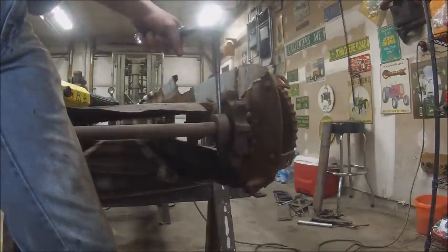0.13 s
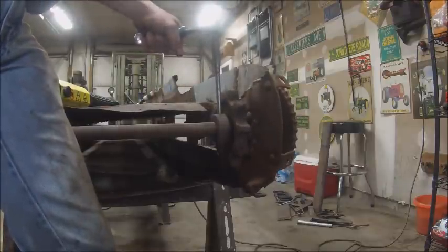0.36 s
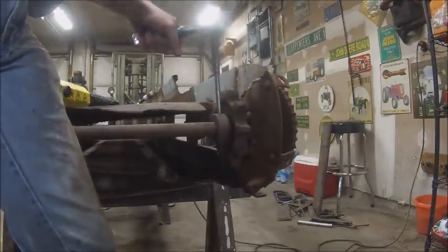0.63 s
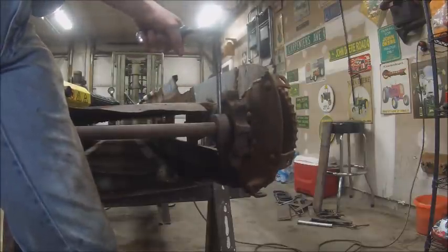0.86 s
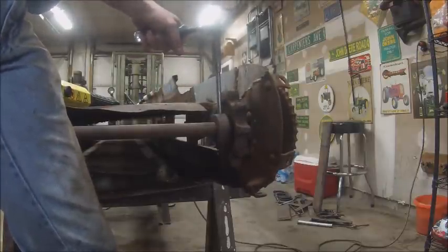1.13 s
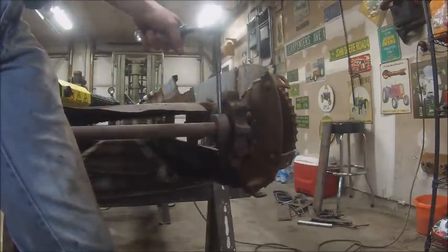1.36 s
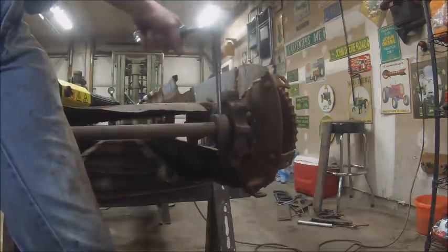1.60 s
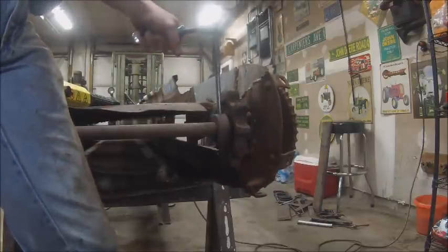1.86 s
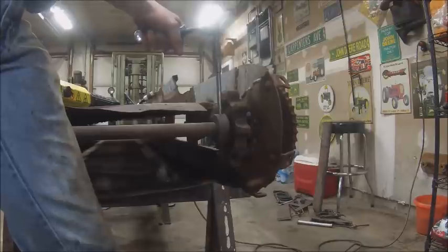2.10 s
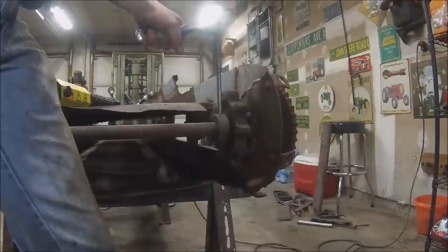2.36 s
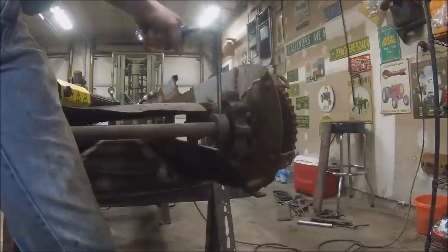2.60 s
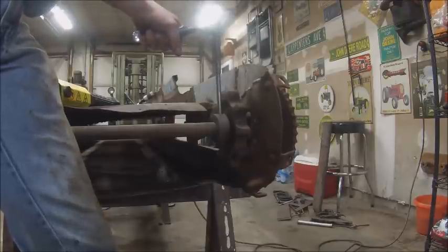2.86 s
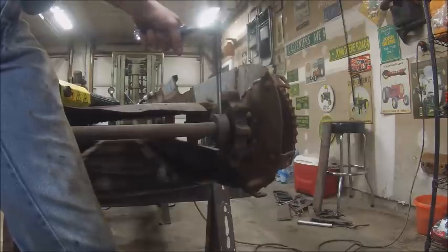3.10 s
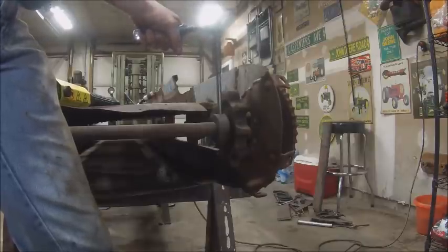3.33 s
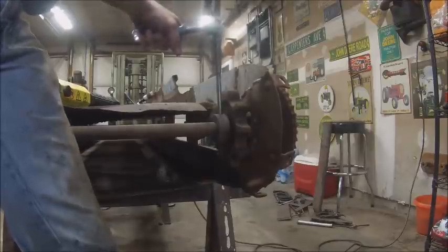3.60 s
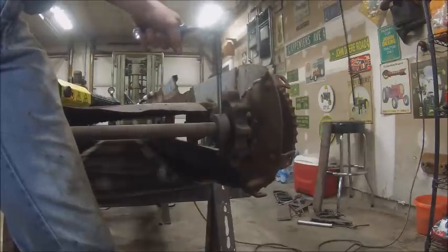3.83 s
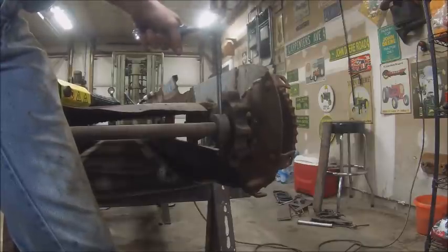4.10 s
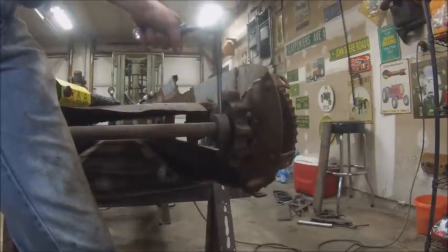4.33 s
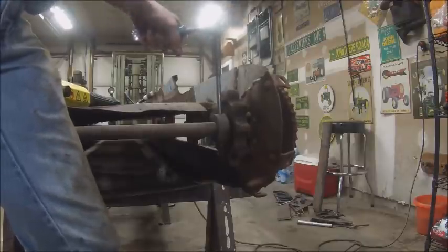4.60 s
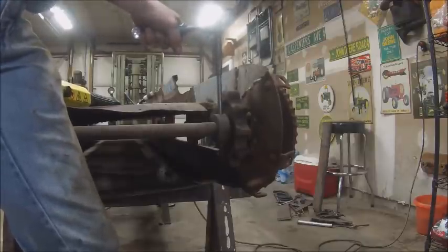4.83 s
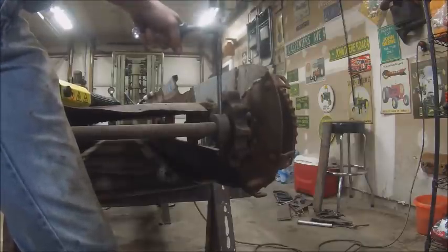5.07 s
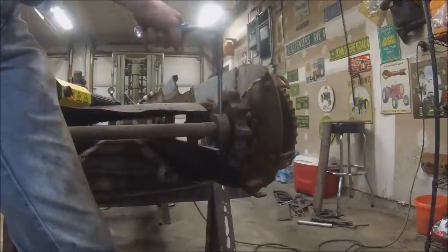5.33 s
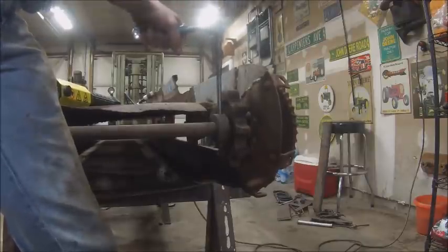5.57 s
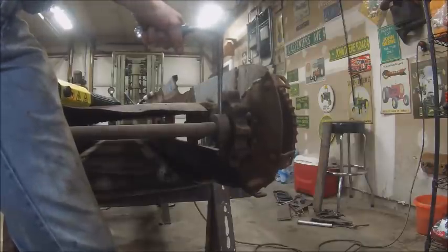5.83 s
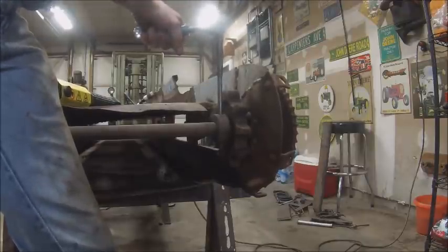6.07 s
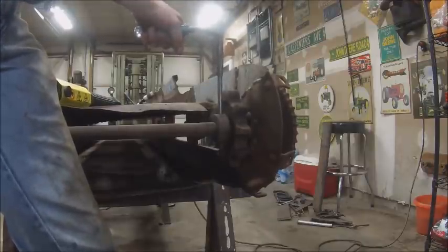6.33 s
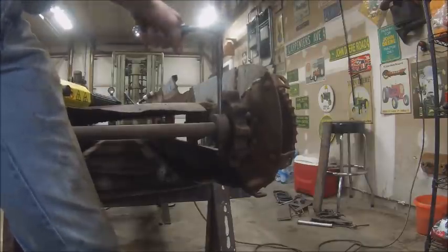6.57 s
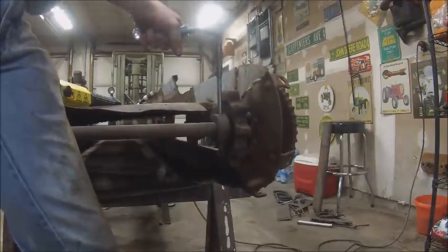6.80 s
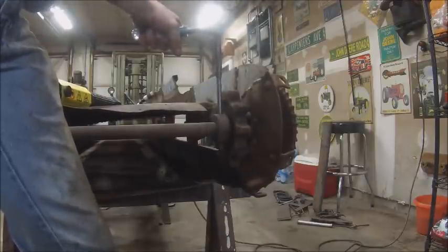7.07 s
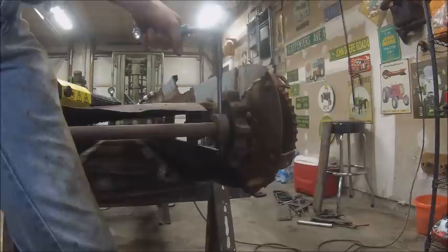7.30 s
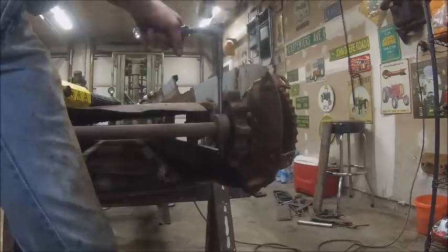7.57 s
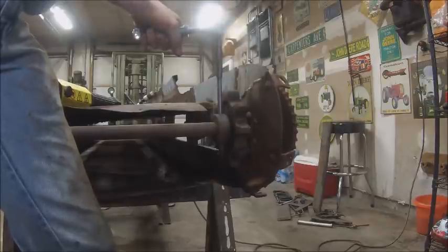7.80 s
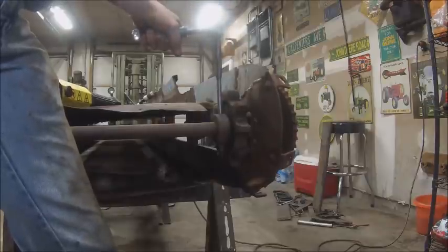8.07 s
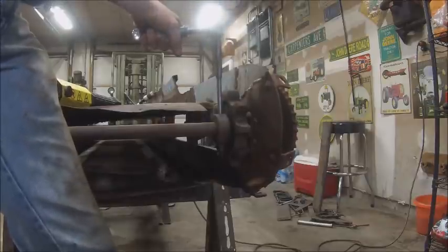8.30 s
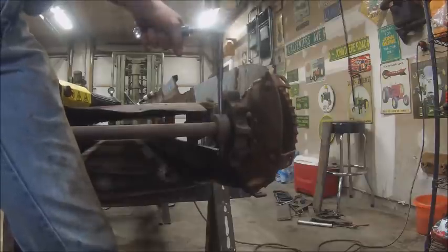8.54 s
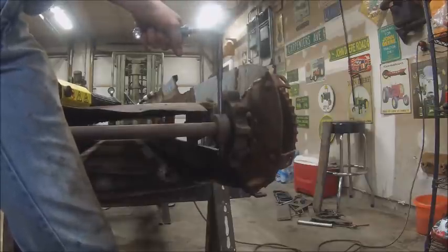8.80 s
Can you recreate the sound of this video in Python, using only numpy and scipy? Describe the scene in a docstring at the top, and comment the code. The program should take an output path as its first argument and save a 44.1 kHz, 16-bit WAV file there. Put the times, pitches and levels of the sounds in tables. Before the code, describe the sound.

Eighteen metallic strikes in a steady tap-and-blow rhythm: a lighter, singing tap, then a louder, brighter crack with a dense clang and frame boom. Loose steel rattles briefly after contact, and the punch scrapes faintly and sings very high between hits. The indoor shop rings on, with quiet low air beneath. Close camera sound, slightly squashed and clipped at the peaks, with tails rising after each hit.

```python
"""Hammer and punch in a workshop

A hammer drives a steel punch against a seized bolt: a light seating tap, then a full blow, in turn.
Noise makes the crack, the rattle and the clang; fading sine waves make the head sing and the frame boom.
The punch scrapes as it settles back and its rod sings, over steady air in a hard-walled shop that rings on.
The camera's look-ahead gain control ducks the blows and lets their tails swell back."""
import sys
import numpy as np
from scipy import signal
from scipy.fft import rfft, irfft
from scipy.io import wavfile
from scipy.ndimage import uniform_filter1d, minimum_filter1d, map_coordinates

SR = 44100
rng = np.random.default_rng(int(sys.argv[2]) if len(sys.argv) > 2 else 0)


def put_to_file(sound):
    """Save the sound as 16-bit audio at rate SR, in the file named by the first command-line argument."""
    columns = np.atleast_2d(sound).T  # one column per channel
    safe = np.clip(columns, -1, 1)
    whole_steps = np.round(safe * 32767)
    wavfile.write(sys.argv[1], SR, whole_steps.astype(np.int16))


def volts_from_db(level):
    """Convert decibel levels to linear amplitude ratios."""
    exponent = np.asarray(level, float) / 20
    return 10 ** exponent


N = 393372  # length of the scene (samples)


def unit(x):
    """Scales a sound to an rms of 1."""
    return x / np.sqrt(np.mean(x ** 2) + 1e-20)


def along(points, hz):
    """Reads a curve of (pitch_hz, value) points on a logarithmic pitch axis."""
    point_hz, value = np.transpose(points)
    return np.interp(np.log(hz + 1), np.log(point_hz + 1), value)


def fade(t, t60):
    """Exponential decay that falls 60 dB in t60 seconds."""
    return volts_from_db(-60 * t / t60)


def colour(x, spectrum, tilt_db=0):
    """Filters a sound by a spectrum, tilted above 1 kHz by tilt_db per octave."""
    hz = np.fft.rfftfreq(len(x), 1 / SR)
    octaves_above = np.log2(np.maximum(hz / 1000, 1))
    gain = volts_from_db(along(spectrum, hz) + tilt_db * octaves_above)
    return irfft(rfft(x) * gain, len(x))


def noise(length, spectrum, tilt_db=0):
    """Coloured noise with an rms of 1."""
    return unit(colour(rng.standard_normal(length), spectrum, tilt_db))


def add(out, s, x):
    """Mixes x into out from time s (seconds)."""
    part = out[round(s * SR):][:len(x)]
    part += x[:len(part)]


def ring(t, hz, db, t60, spread_db, cycles, split, blur):
    """Fading modes of random strength: each swells over some cycles, wanders in phase and beats with a twin."""
    level_db, twin = rng.standard_normal((2, len(hz), 1))
    steps = rng.standard_normal((len(hz), len(t)))
    wander = np.cumsum(steps, axis=1) * np.sqrt(blur * hz[:, None] / SR)
    phase = 2 * np.pi * hz[:, None] * t
    swell = 1 - fade(t, cycles / hz[:, None])
    shape = volts_from_db(db[:, None] + spread_db * level_db) * fade(t, t60[:, None]) * swell
    pair = np.sin(phase + wander) + 1.08 * np.sin(phase * (1 + split * twin))
    return (shape * pair).sum(axis=0)


# Steady air of the shop, relative levels: (pitch_hz, level_db per Hz)
AIR_SPECTRUM = [(12, -46), (20, -17), (91, -17), (128, -7.5), (155, -1), (194, 6.5), (230, -16),
                (439, -25.5), (1110, -35.5), (4150, -58.5), (6330, -49), (16400, -68)]


def shop_air():
    """The steady air of the shop is quiet noise, strongest in the low range."""
    return volts_from_db(-49.5) * noise(N, AIR_SPECTRUM)


# How the shop's diffuse sound grows and dies: (pitch_hz, build_up_s, early_t60_s, late_t60_s)
SHOP_DECAY = [(100, 0.74, 0.71, 2.66), (282, 0.17, 0.34, 1.51), (1000, 0.0033, 0.42, 1.19),
              (2910, 0.0061, 0.28, 0.96), (8250, 0.014, 0.15, 0.64), (15000, 0.011, 0.079, 0.45)]


def echoes(spectrum, tilt_db, early_db):
    """A fresh diffuse tail of energy 1: each band builds up, drops fast at first, then dies slowly."""
    length = round(1.3 * SR)
    hz, t, bands = signal.stft(noise(length, spectrum, tilt_db), SR, nperseg=128)
    decay = np.array(SHOP_DECAY)
    build, early, late = [along(decay[:, [0, k]], hz)[:, None] for k in range(1, 4)]
    dying = np.hypot(volts_from_db(early_db) * fade(t, early), fade(t, late))
    tail = signal.istft(bands * (1 - fade(t, build)) * dying, SR, nperseg=128)[1][:length]
    return tail / np.linalg.norm(tail)


def in_shop(x, wet_db):
    """Ringing steel is heard directly and, by convolution with a diffuse tail, through the room."""
    out = volts_from_db(wet_db) * signal.fftconvolve(x, echoes([(1000, 0)], 0, early_db=17))
    out[:len(x)] += x
    return out


# Dense clang of the struck steel, one list for a tap and one for a full blow,
# relative levels: (pitch_hz, level_db per Hz)
CLANG_SPECTRA = [
    [(24, -68), (40, -40), (121, -22.5), (231, -15), (290, -1.5), (556, -15), (770, -13), (942, -13.5),
     (1350, -17.5), (2260, -20), (6650, -19.5), (7730, -22.5), (14100, -33), (15300, -37.5), (16000, -80)],
    [(24, -59), (40, -21), (75, -27.5), (121, -18), (231, -6), (372, -5), (467, -11.5), (751, -9),
     (873, -11.5), (1370, -15), (2200, -18.5), (7540, -23.5), (14500, -34.5), (15300, -41.5), (16000, -87)],
]


def clang(full, tilt_db, early_db):
    """The struck steel fills the shop with a dense clang: noise that dies away band by band."""
    clang_db = [16, 19][full]  # over the blow's strength
    return volts_from_db(clang_db) * echoes(CLANG_SPECTRA[full], tilt_db, early_db)


# First contact of steel on steel, one list for a tap and one for a full blow,
# relative levels: (pitch_hz, level_db per Hz)
CRACK_SPECTRA = [
    [(180, -67), (400, -19), (1000, -17), (2090, -11), (6540, -12.5), (7480, -22), (9620, -30.5),
     (14600, -36), (16400, -49)],
    [(180, -47), (400, -9.5), (1000, -2), (2130, -4.5), (5180, -8), (7870, -8), (8850, -14), (14600, -27),
     (16400, -48)],
]


def crack(t, full, tilt_db):
    """Steel meets steel in a short burst of noise, followed by an uneven rattle of loose steel."""
    crack_db, crack_s = [-4, 1][full], [.0022, .003][full]  # over the blow's strength; length
    rattle_db, rattle_t60_s = [-20, -21][full], .12  # typical level under the contact
    knocks_db = 4 * map_coordinates(rng.standard_normal(140), [t * 250])  # loose steel knocks unevenly
    contact = np.exp(-(t / crack_s) ** 3)
    rattle = volts_from_db(knocks_db + rattle_db) * fade(t, rattle_t60_s)
    burst = (1 - fade(t, .004)) * (contact + rattle)  # quick but soft start
    return volts_from_db(crack_db) * burst * noise(len(t), CRACK_SPECTRA[full], tilt_db)


# Modes of the sprocket, shaft and frame, relative levels:
# (pitch_hz, tap_level_db, full_blow_level_db, t60_s)
FRAME_MODES = [(129, -8, -8, .6), (188, -9, -7, .8), (292, -4, -2, .3), (334, -12, -8, .3),
               (370, -5, 1, .65), (436, -14, -8, .2), (603, -14, -8, .15), (883, -10, -12, .15),
               (720, 1, -10, .15), (762, 4, -6, .18), (829, 0, -10, .15), (1365, 6, -3, .07),
               (1093, -6, -8, .12), (1207, -6, -5, .08), (1990, 3, 3, .02), (2140, -11, -13, .12),
               (3200, -11, -22, .3), (4320, -14, -24, .15), (5285, -11, -25, .3)]


def frame(t, full):
    """The sprocket, shaft and frame boom together as many fading modes."""
    boom_db = [-24, -22][full]  # over the blow's strength
    modes = np.transpose(FRAME_MODES)
    return volts_from_db(boom_db) * ring(t, modes[0], modes[1 + full], modes[3],
                               spread_db=1.5, cycles=7.9, split=.02, blur=.04)


# The hammer head's two bell modes, damped sooner when a full blow presses the head on the punch:
# (pitch_hz, tap_t60_s, full_blow_t60_s)
HEAD_MODES = [(7472, .075, .015), (7785, .05, .015)]


def hammer_head(t, full, head_db):
    """The hammer head sings in two high bell modes, more briefly after a full blow."""
    modes = np.transpose(HEAD_MODES)
    return ring(t, modes[0], np.array(head_db), modes[1 + full], spread_db=1, cycles=8, split=.002, blur=.01)


# Taps and full blows in turn; the head levels are over the blow's strength:
# (start_s, strength_db, lower_head_mode_level_db, upper_head_mode_level_db)
BLOW_LIST = [(.171, -7, -25.5, -15.5), (0.6137, -2.5, -32, -30.5), (1.1597, -8, -19, -24),
             (1.604, -4.5, -18.5, -14), (2.1401, -8.5, -18, -25), (2.6, -3, -23, -20),
             (3.1135, -8.5, -16.5, -28.5), (3.5755, -2.5, -29, -10), (4.0773, -7, -15, -23),
             (4.5432, -4, -33, -24), (5.0634, -8, -17, -22), (5.5421, -2.5, -32, -23.5),
             (6.0425, -8, -14.5, -23), (6.527, -3.5, -22, -19), (6.9938, -11, -18, -9),
             (7.4715, -2.5, -27, -26), (7.9679, -9.5, -19.5, -12.5), (8.4492, -3, -26, -20)]


def hammer():
    """Each blow cracks, fills the shop with a clang and sets the frame and the hammer head ringing."""
    out, t = np.zeros(N), np.arange(SR // 2) / SR
    bright_db = [-2.5, 0.06]  # tilt above 1 kHz for a tap and a full blow (dB per octave)
    room_db = [-5.5, -6]  # the ringing steel in the room, for a tap and a full blow

    # a full blow before the start still rings in the shop
    earlier_s, earlier_db = 0.32, -13.5  # time since that blow; its strength
    earlier = clang(1, bright_db[1], early_db=15)
    add(out, 0, volts_from_db(earlier_db) * earlier[round(earlier_s * SR):])

    for k, (s, db, *head_db) in enumerate(BLOW_LIST):
        full = k % 2  # 0 for a tap, 1 for a full blow
        steel = frame(t, full) + hammer_head(t, full, head_db)
        add(out, s, volts_from_db(db) * crack(t, full, bright_db[full]))
        add(out, s, volts_from_db(db) * clang(full, bright_db[full], early_db=12))
        add(out, s, volts_from_db(db) * in_shop(steel, wet_db=room_db[full]))
    return out


# Gritty scrape of the punch tip, relative levels: (pitch_hz, level_db per Hz)
GRIT_SPECTRUM = [(1500, -57), (3500, -5), (6200, 3), (8000, 0), (11500, -10), (15300, -38), (16500, -56)]


def scrape(t):
    """The punch slides back on the bolt: its tip sticks and slips, so the gritty noise is uneven."""
    level_db = -58 + 3.5 * rng.standard_normal()
    slips = map_coordinates(rng.standard_normal(40), [t * 60])
    shape = fade(t, 4.2) * (1 - fade(t, 0.28)) * (1 - 2 * t)  # swells, then dies within half a second
    return volts_from_db(level_db) * volts_from_db(1.9 * slips) * noise(len(t), GRIT_SPECTRUM) * shape


# High modes of the punch rod, relative levels: (pitch_hz, level_db, t60_s)
ROD_MODES = [(11400, -25, .5), (13780, -17, 1.6)]


def punch_rod(t):
    """The rod of the punch sings in high modes that swell slowly and fade."""
    hz, level_db, t60 = np.transpose(ROD_MODES)
    return ring(t, hz, level_db, t60, spread_db=1.5, cycles=2500, split=.001, blur=.005)


# The punch touches down and its rod sings, levels over those of the rod modes: (start_s, level_db)
TOUCH_LIST = [(.85, -57), (1.7, -59), (2.889, -50), (3.75, -55), (4.75, -58), (5.8, -59), (6.8, -57),
              (7.63, -59), (8.629, -57)]


def punch():
    """A faint scrape follows each full blow, and each touch of the punch leaves its rod singing."""
    out, t = np.zeros(N), np.arange(SR // 2) / SR
    for s, *_ in BLOW_LIST[1::2]:
        add(out, s + 0.2, scrape(t))  # 0.2 s after the blow
    for s, db in TOUCH_LIST:
        add(out, s, volts_from_db(db) * punch_rod(t))
    return out


def scene():
    """Hammer and punch over the shop's steady air, in one channel."""
    return (shop_air() + hammer() + punch())[None]


def band_limit(x):
    """A steep low-pass at the top of the band."""
    return signal.sosfilt(signal.butter(12, 16590, fs=SR, output="sos"), x)


def record(dry):
    """The camera's gain drops just ahead of each peak and recovers exponentially; peaks are softly clipped."""
    ahead = round(.008 * SR)  # look-ahead of 8 ms (samples)
    threshold_db, cut_per_db, recovery_s = -12, .62, 0.077
    level_db = 20 * np.log10(np.abs(dry[0]) + 1e-9)
    over_db = np.maximum(level_db - threshold_db, 1e-3)
    held_db = -minimum_filter1d(-cut_per_db * over_db, 2 * ahead + 1)  # largest cut nearby
    # the cut rises at once, then shrinks exponentially
    leak = np.arange(N) / SR / recovery_s
    cut_db = np.exp(np.maximum.accumulate(np.log(held_db) + leak) - leak)
    smooth_cut_db = uniform_filter1d(cut_db, ahead // 2)
    x = volts_from_db(8.5) * dry * volts_from_db(-smooth_cut_db)
    x = x / (1 + np.abs(x / .9) ** 8) ** (1 / 8)  # soft clip towards 0.9
    x = signal.sosfilt(signal.butter(10, 16400, fs=SR, output='sos'), x)  # band limit in Hz
    return band_limit(x)


dry = scene()
out = record(dry)
put_to_file(out)
```